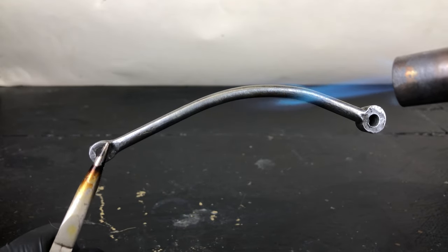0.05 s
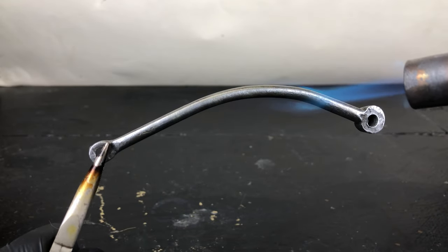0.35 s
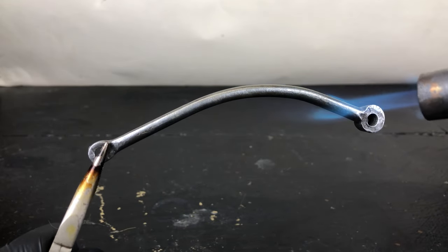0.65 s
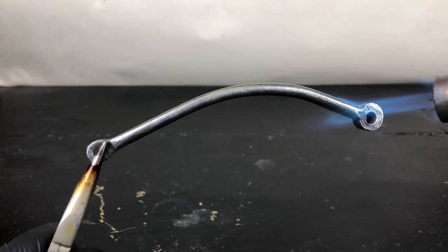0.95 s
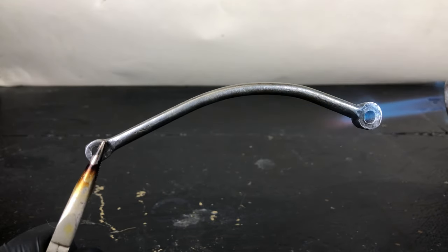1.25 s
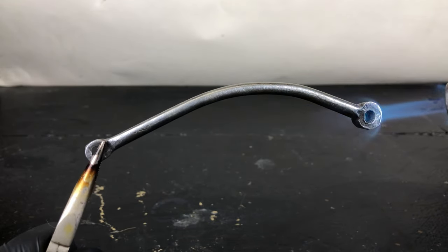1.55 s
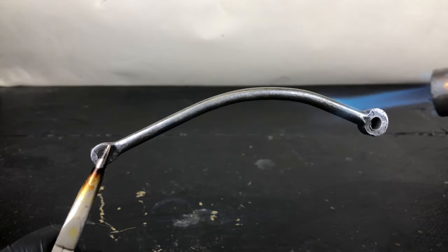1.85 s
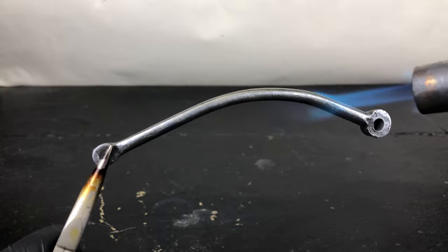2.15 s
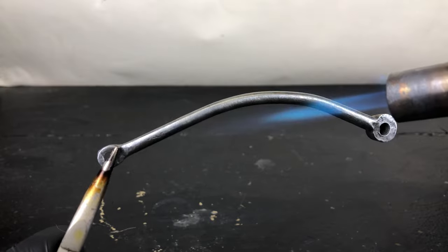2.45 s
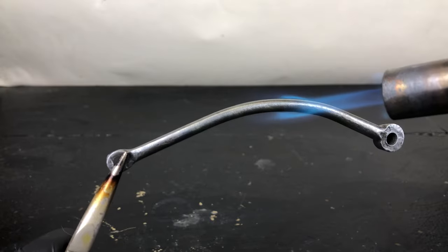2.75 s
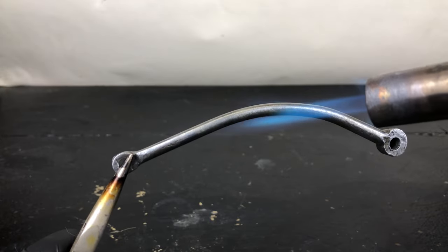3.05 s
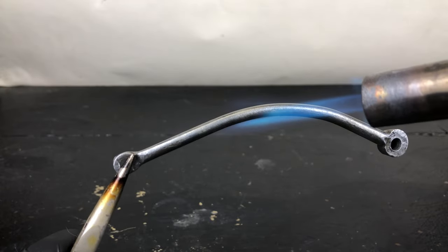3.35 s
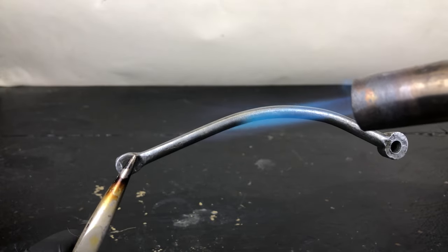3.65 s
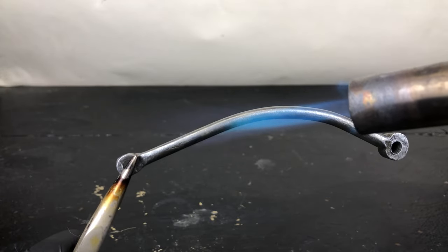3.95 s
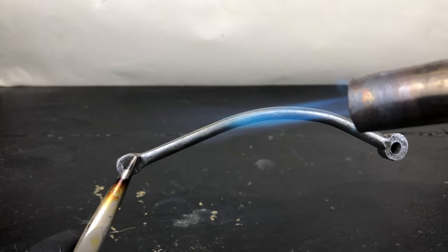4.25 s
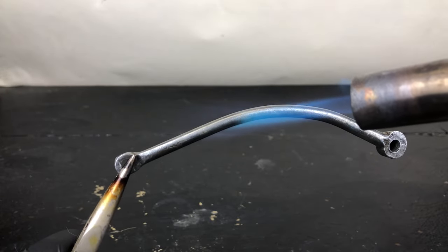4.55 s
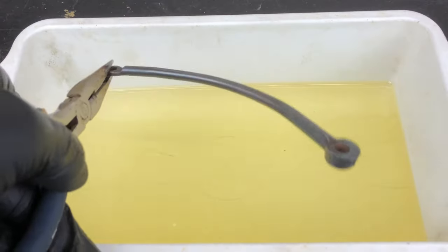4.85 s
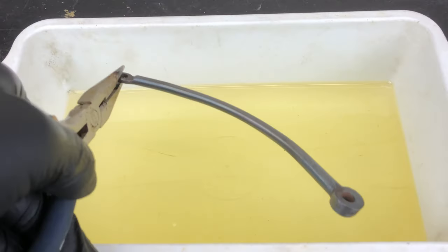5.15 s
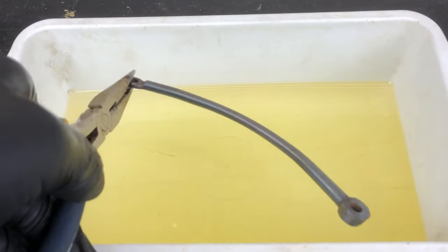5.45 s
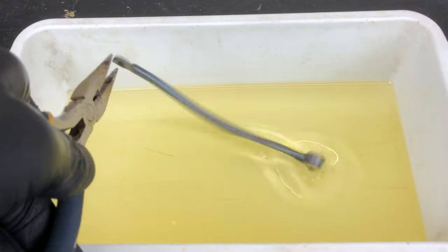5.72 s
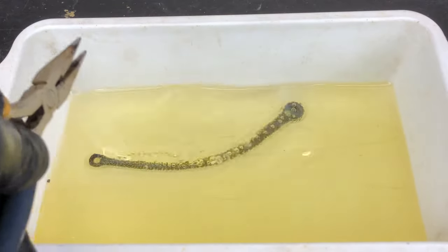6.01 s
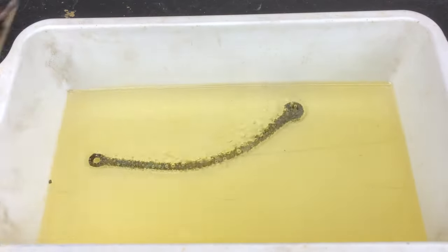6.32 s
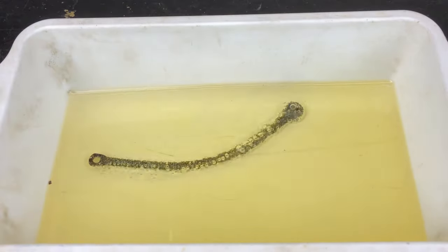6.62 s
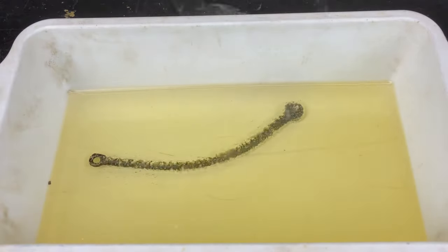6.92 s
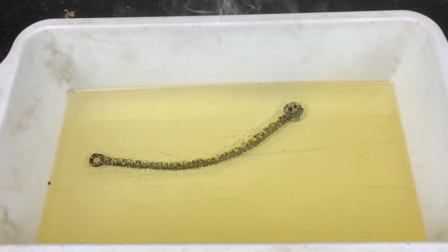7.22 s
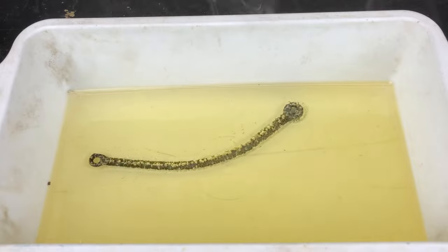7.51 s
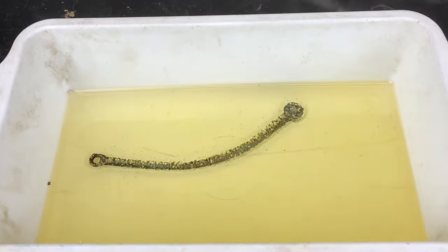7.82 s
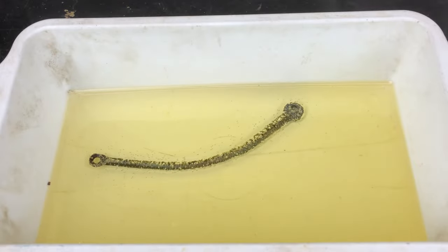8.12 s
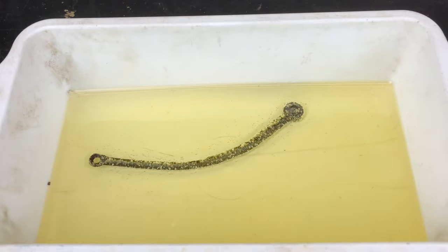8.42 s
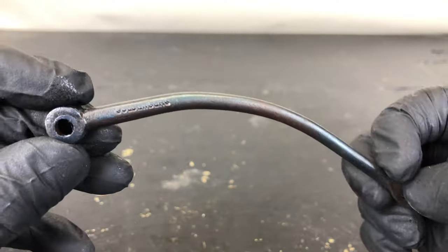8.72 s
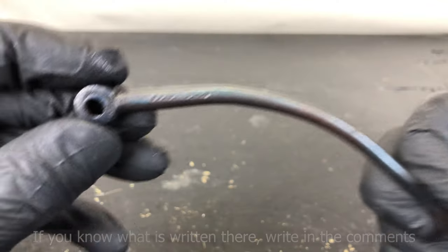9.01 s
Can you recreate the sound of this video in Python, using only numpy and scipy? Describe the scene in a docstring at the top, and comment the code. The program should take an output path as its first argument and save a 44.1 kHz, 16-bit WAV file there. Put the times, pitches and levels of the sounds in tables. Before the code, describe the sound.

A gas blowtorch hisses and roars, stops abruptly, then a hot steel rod clatters into a plastic tub of liquid, fizzing and popping.

```python
"""Blowtorch and quench at a workbench

One microphone by the bench in a small workshop. A gas blowtorch roars and hisses over a steel rod,
then stops abruptly. Pliers tick; the hot rod drops into a plastic tub of liquid and bounces, ringing
the tub. Bubbles pop and a fizz dies away as it cools. Gloved hands click and slide on the rod,
and dull knocks come from further off."""
import sys
import numpy as np
from scipy import signal
from scipy.fft import rfft, irfft, next_fast_len
from scipy.io import wavfile

SR = 44100
rng = np.random.default_rng(int(sys.argv[2]) if len(sys.argv) > 2 else 0)


def persist_wave(psi):
    """Save psi, clipped to +-1, as 16-bit WAV."""
    counts = np.round(np.clip(psi, -1, 1) * 32767).astype(np.int16)
    wavfile.write(sys.argv[1], SR, np.atleast_2d(counts).T)


N = 408807
T = np.arange(N) / SR
TORCH_END_S, PLUNGE_S = 4.763, 5.705
BOIL_ATTACK_S, BOIL_HOLD_S = .04, .28

# how the torch is held: (time [s], hiss pitch [ratio], nozzle closeness to the rod [0-1])
TORCH_POSE = [(0, 0.98, 0.44), (.6, 1.003, 0.1), (1.1, 1.067, 0.07), (1.5, 1.1, 0.15), (1.9, 1.01, 0.18),
              (2.36, 1.01, 0.33), (2.52, 1, 0.92), (2.68, 0.99, 0.09), (3.0, 1.0, 0.35), (3.4, .985, 0.56),
              (4.1, 0.99, 0.91), (4.72, 1.004, 0.73)]
# hollow tones of the flame over the bench: (frequency [Hz], width [Hz], level [dB])
ROAR_MODES = [(162, 19.6, -0.5), (290, 56, -4.5), (364.5, 50.5, 6.5), (449, 54, -1.5), (575.6, 125, -1.5),
              (802.4, 100, -3.5), (922, 29, -10.5), (1057, 19, -1), (1178, 160, -2.5)]
# broad turbulence of the flame: (frequency [Hz], level [dB])
ROAR_COLOUR = [(30, -61), (60, -18), (110, -16.5), (250, -7.5), (600, -6), (1000, -10.5), (1400, -13),
               (2000, -32), (4000, -41)]
# gas jet and nozzle: (frequency [Hz], width [Hz], level far from the rod [dB], level close to it [dB])
JET_MODES = [(1475, 140, -0.5, 4.5), (1660, 170, -0.5, 4), (1826, 185, -2.5, 4), (1995, 170, -1.5, -2),
             (2138, 145, -2.5, 6), (2410, 220, -6.5, -5.5), (2597, 57, -6, -35), (2750, 160, -13.5, -1),
             (3200, 270, -6, 0), (3550, 280, -4, -0.5), (3780, 173, -5.5, -2.5), (3986, 320, -11, -4),
             (4650, 190, -26, -2), (5020, 370, -9.5, -6.5), (5420, 460, -8.5, -9.5), (6730, 840, -21, -7.5),
             (8110, 450, -22, -7.5), (9000, 840, -31, -5), (11900, 1600, -37, -17.5),
             (15000, 700, -50, -26)]
# broad turbulence of the jet: (frequency [Hz], level [dB])
JET_COLOUR = [(500, -46), (1300, -6), (2000, -9.5), (2900, -13), (4500, -14.5), (6000, -17.5), (7500, -20),
              (8500, -16.5), (10000, -25), (12000, -28), (13000, -35), (15500, -53)]
# surfaces round the flame: (lag with nozzle far [s], lag with it close [s], reflection [signed ratio])
SURFACES = [(.00178, .00182, -0.034), (.00298, 0.0026, -0.17), (.00278, 0.0033, 0.059),
            (.00360, 0.0047, 0.13), (.00615, 0.0037, -0.14), (.00664, 0.0074, 0.075),
            (.00748, 0.0096, 0.075), (.0096, 0.0093, 0.12), (0.0127, 0.011, -0.11), (0.0169, .0168, 0.11)]
# the rod strikes the tub: (time [s], level [dB], centre [Hz], width [octaves], rattle against ring [dB])
TUB_BLOWS = [(5.7376, -14.5, 1060, 1.7, 1), (5.7642, -27, 1200, 1.1, -8), (5.8031, -12.5, 2400, 1.5, 6.5),
             (5.8268, -18.5, 2000, 1.47, 5), (5.8834, -21, 2000, 1.8, -2), (5.897, -20.5, 1790, 1.18, 4),
             (5.9019, -32, 1300, 1.3, -30.5), (5.9439, -33, 1460, 1.2, 1)]
# the plastic tub with its liquid: (frequency [Hz], level [dB], t60 [s])
TUB_MODES = [(355, -14, 0.12), (580, -9, 0.055), (827, -5, 0.048), (965, -2.5, 0.039), (1086, -1, 0.027),
             (1117, -6, .06), (1261, -9.5, 0.035), (1497, -3.5, 0.04), (1700, -8, .013), (1940, 1.5, .016),
             (2490, -9, .02), (2760, -5, 0.027), (3130, -6.5, 0.024), (3380, -8.5, 0.022),
             (4030, -1.5, 0.0069), (5130, -4, .011), (6570, -8, 0.01)]
# rattle of the rod in the tub: (frequency [Hz], level [dB])
RATTLE_COLOUR = [(150, -14), (600, -11.5), (1800, 4.5), (2600, -8), (4500, -7.5), (8000, -11.5),
                 (11500, -17), (14000, -21.5), (16000, -39.5)]
# the loudest bubbles on the hot rod: (time [s], relative level [dB], pitch [Hz], relative treble [dB])
LOUD_POPS = [(5.966, -32, 1780, -10), (6.0036, -30, 3420, -17), (6.0193, -36, 3430, -8),
             (6.0532, -35, 3440, 1), (6.078, -37, 3530, -2), (6.0885, -29, 3660, -6),
             (6.0962, -30, 3570, -11), (6.1044, -36, 3480, -12), (6.1772, -23.5, 3400, -30),
             (6.2262, -32.5, 2300, -30), (6.265, -35.5, 1700, -27), (6.3472, -36, 2060, -30),
             (6.3972, -41.5, 3800, -9), (6.4625, -38, 3400, -3), (6.5972, -40.5, 3450, -9),
             (6.776, -51.5, 3450, -22)]
# the hollow above the liquid: (frequency [Hz], level [dB], t60 [s])
HOLLOW_MODES = [(1670, 1.5, 0.027), (1940, -3.5, 0.018), (2190, -3, 0.017), (2700, -14, 0.02),
                (3100, -15, 0.03), (3500, 1, 0.017), (3910, -2, 0.018), (5440, -5, 0.011),
                (5760, -1, 0.009), (6500, -2.5, 0.014), (7200, 1, 0.013), (8000, -5, .014)]
# heaving liquid: (frequency [Hz], level [dB])
SLOSH_COLOUR = [(30, -34), (55, -10), (85, -1), (125, -4.5), (158, 1), (215, -9), (400, -11), (800, -13),
                (2000, -43.5)]
# tiny bubbles bursting: (frequency [Hz], level [dB])
FIZZ_COLOUR = [(600, -23), (1200, -10), (1800, 6.5), (2600, -5), (3700, 1), (4700, -5.5), (6000, -5.5),
               (9000, -14.5), (15000, -24.5)]
# pliers and gloves touch the rod: (time [s], level [dB], pitch [Hz], width [octaves], t60 [s])
ROD_CLICKS = [(5.231, -49.5, 1850, 1.15, 0.056), (5.255, -45.5, 2090, 1.06, 0.03),
              (5.346, -45, 1630, 0.29, 0.019), (5.346, -61, 4200, 0.37, .02),
              (5.362, -57.5, 1800, 0.82, 0.028), (8.416, -61.5, 4480, 0.51, 0.052),
              (8.734, -35.5, 5560, 0.25, 0.0043), (8.734, -38.5, 4130, 0.85, 0.0044),
              (8.916, -51.5, 1690, 1.6, 0.15), (9.023, -57, 3100, 0.39, 0.014)]
# gloves sliding on steel: (frequency [Hz], level [dB])
RUB_COLOUR = [(800, -16.5), (1800, -13), (3500, -4), (5300, -4.5), (6300, 1), (7300, -12.5), (15000, -25)]
# knocks further off: (time [s], relative level [dB], boom [dB], brightness [dB])
KNOCKS = [(4.876, -48.5, -5, -7), (4.961, -50.5, -17, -9), (5.149, -56.5, -8, 4.5), (5.163, -46, -7, -19),
          (5.345, -53, -0.5, -1), (5.572, -50.5, -13, -6), (6.159, -50.5, -2.5, -1.5), (6.244, -49, -7, -1),
          (6.315, -48, -4.5, -4.5), (6.492, -55.5, -1.5, -2), (6.981, -48.5, -13.5, -3),
          (7.2101, -47.5, -2, -7.5), (7.366, -49, -9.5, -9), (7.877, -49, -2, -6.5), (7.958, -58, -5, -8.5),
          (8.915, -63, -3, 5), (9.177, -48.5, -4.5, -5)]
# the quiet air of the workshop: (frequency [Hz], level [dB])
AIR_COLOUR = [(15, -64), (25, -29), (43, -16.5), (87, -6), (127, -11.5), (206, -12), (229, -10.5),
              (545, -16.5), (1130, -25.5), (1330, -26), (1740, -27.5), (1940, -30.5), (2910, -29.5),
              (8830, -33.5), (16000, -44)]
# the workshop's echo: (frequency [Hz], t60 [s])
ROOM_DECAY = [(150, .4), (500, 0.23), (1500, 0.16), (4000, 0.14), (12000, .15)]


def blowtorch(roar_db=-40, hiss_db=-37, shadow_db=10, flutter_db=.3, sputter_db=.63, waver_db=.5):
    """The flame roars low; the jet's hiss shifts as the nozzle moves and drops close to the rod."""
    pitch, close = curves(TORCH_POSE)
    hiss_level_db = hiss_db - shadow_db * close ** 2 + waver_db * walk(3.6)
    roar = turbulence(ROAR_COLOUR) + sum(undb(db) * resonance(hz, width) for hz, width, db in ROAR_MODES)
    jet = turbulence(JET_COLOUR)
    for hz, width, far_db, near_db in JET_MODES:
        jet += undb(far_db + close * (near_db - far_db)) * resonance(hz * pitch, width)
    flame = unit(roar) * undb(roar_db + flutter_db * walk(25))
    flame += unit(jet) * undb(hiss_level_db + sputter_db * walk(30))
    # reflections reach the microphone by moving paths and comb the hiss
    echoes = sum(share * np.interp(T - far_s - close * (near_s - far_s), T, flame)
                 for far_s, near_s, share in SURFACES)
    return (flame + echoes) * (T < TORCH_END_S)


def tub_blows(wall_lag_s=.0016, wall_share=.25, splash_db=-16):
    """Each blow of the rod rings the tub, rattles and splashes; the wall returns it at once."""
    out, t = np.zeros(N), T[:SR // 6]
    for s, db, centre_hz, octaves, rattle_db in TUB_BLOWS:
        contact = hump(centre_hz, octaves)
        ring = np.zeros(len(t))
        for k, (hz, mode_db, t60) in enumerate(TUB_MODES):
            tone = np.sin(2 * np.pi * hz * (1 + .006 * rng.standard_normal()) * t)
            ring += (-1) ** k * undb(mode_db) * contact(hz) * fade(t, t60) * tone
        rattle = noise(lambda f: colour(RATTLE_COLOUR)(f) * contact(f), len(t)) * fade(t, t60=.022)
        splash = noise(hump(1400, .89), len(t)) * fade(t, t60=.075)
        hit = burst(ring) + undb(rattle_db) * burst(rattle) + undb(splash_db) * burst(splash)
        hit = undb(db) * burst(hit)
        add(out, s, hit)
        add(out, s + wall_lag_s, wall_share * hit)
    return shape(out, lambda f: bending_wall(f) * low_cut(f, 240))


def bending_wall(f, lag_s=.012, corner_hz=380):
    """Complex gain of the liquid-loaded plastic: low bending waves travel slowly and arrive late."""
    return np.exp(-2j * np.pi * lag_s * corner_hz * np.arctan(f / corner_hz))


def bubble_pops(gain_db=-9.5, snap_db=-8, open_s=.000098):
    """Each pop snaps and rings the hollow above the liquid, most strongly near its own pitch."""
    out, t = np.zeros(N), T[:SR // 20]
    for s, db, pitch_hz, treble_db in LOUD_POPS + faint_pops():
        focus = hump(pitch_hz, octaves=.51)
        tilt = colour([(3900, 0), (5700, 16 + .93 * treble_db)])
        ring = np.zeros(len(t))
        for hz, mode_db, t60 in HOLLOW_MODES:
            cycles = hz * (1 + .012 * rng.standard_normal()) * t + rng.random()
            ring += undb(mode_db) * focus(hz) * tilt(hz) * fade(t, t60) * np.sin(2 * np.pi * cycles)
        snap = noise(hump(3200, 1), len(t)) * fade(t, t60=.0087)
        pop = (burst(ring) + undb(snap_db) * burst(snap)) * rise(t, open_s)
        add(out, s, undb(db + gain_db) * burst(pop))
    return shape(out, lambda f: low_cut(f, 1500) * high_cut(f, 12500))


def faint_pops(count=6, span_s=1, start_db=-46, sag_db_per_s=14, centre_hz=3000, treble_db=-12):
    """Random bubbles, ever sparser and weaker as the rod cools, as rows like those of LOUD_POPS."""
    rows, boil_end_s = [], PLUNGE_S + BOIL_ATTACK_S + BOIL_HOLD_S
    for k, (when, height) in enumerate(rng.random((count, 2))):
        age_s = span_s * ((k + when) / count) ** 2
        pitch_hz = centre_hz * 2 ** (height - .5)
        rows.append((boil_end_s + age_s, start_db - sag_db_per_s * age_s, pitch_hz, treble_db))
    return rows


def slosh(level_db=-34, blow_share=.15):
    """The liquid heaves after each blow, a little more after a hard one."""
    power, t = np.zeros(N), T[:SR // 2]
    surge = rise(t, .003) * fade(t, t60=.26)
    for s, blow_db, *_ in TUB_BLOWS:
        add(power, s, (undb(level_db + blow_share * blow_db) * surge) ** 2)
    return np.sqrt(power) * noise(colour(SLOSH_COLOUR))


def fizz(boil_db=-51, simmer_db=-67):
    """The hot rod boils the liquid in tiny pops: a short hard boil and a long faint simmer."""
    boil = undb(boil_db) * envelope(PLUNGE_S, BOIL_ATTACK_S, BOIL_HOLD_S, t60=1.43)
    simmer = undb(simmer_db) * envelope(PLUNGE_S, BOIL_ATTACK_S, BOIL_HOLD_S, t60=9)
    return crackle(FIZZ_COLOUR, per_s=1900, spread_db=5, t60=.014) * np.hypot(boil, simmer)


def rod_clicks():
    """Pliers and gloves make short dry contacts with the rod."""
    out, t, lead = np.zeros(N), T[:SR // 6], SR // 200
    for s, db, hz, octaves, t60 in ROD_CLICKS:
        contact = np.pad(rng.standard_normal(len(t)) * fade(t, t60), (lead, 0))
        add(out, s - lead / SR, undb(db) * burst(shape(contact, hump(hz, octaves))))
    return out


def glove_rub(level_db=-68.5):
    """Gloves slide once along the rod with a fine rustle."""
    slide = envelope(start_s=8.685, attack_s=.02, hold_s=.3, t60=.39)
    return undb(level_db) * crackle(RUB_COLOUR, per_s=6000, spread_db=5.5, t60=.008) * slide


def distant_knocks(tail_db=-17, tail_t60=.99):
    """Soft knocks far from the microphone: the lows build later and stay longer; a faint tail lingers."""
    out, t = np.zeros(N), T[:SR // 2]
    # low, middle and upper band: (centre [Hz], width [octaves], gain [dB], t60 [s], rise [s])
    bands = [(158, .38, 1, .42, .0064), (365, .52, 3.5, .2, .0032), (650, .85, 0, .21, .0016)]
    for s, db, boom_db, bright_db in KNOCKS:
        for tilt_db, (hz, octaves, band_db, t60, rise_s) in zip((boom_db, 0, bright_db), bands):
            swell = rise(t, rise_s) * np.hypot(fade(t, t60), undb(tail_db) * fade(t, tail_t60))
            add(out, s, undb(db + tilt_db + band_db) * noise(hump(hz, octaves), len(t)) * swell)
    return out


def room_tone(level_db=-63.5, waver_db=.5):
    """The quiet air of the workshop, wavering slightly in level."""
    return noise(colour(AIR_COLOUR)) * undb(level_db + waver_db * walk(4.5))


def room(x, early_db, early_t60, late_db):
    """The microphone hears the direct sound, quick reflections off the bench and a short diffuse tail."""
    t = T[:SR // 2]
    hz, t60s = np.transpose(ROOM_DECAY)
    white = rng.standard_normal(len(t))
    late = sum(shape(white, lambda f: np.interp(np.log(f), np.log(hz), band)) * fade(t, t60)
               for band, t60 in zip(np.eye(len(hz)), t60s))
    early = rng.standard_normal(len(t)) * fade(t, early_t60) * (t > .002)
    echo = undb(early_db) * unit(early) + undb(late_db) * unit(late * np.minimum(t / .01, 1))
    return x + signal.fftconvolve(x, echo / np.sqrt(len(t)))[:N]


def resonance(hz, width_hz):
    """Turbulence in one resonance whose centre may move; equal height per Hz."""
    slow = np.arange(0, N, 8)
    bell = np.exp(-2 * np.log(2) * (np.fft.fftfreq(len(slow), slow[1] / SR) / width_hz) ** 2)
    spectrum = bell * (rng.standard_normal(len(slow)) + 1j * rng.standard_normal(len(slow)))
    swell = np.interp(np.arange(N), slow, np.fft.ifft(spectrum))
    carrier = np.exp(2j * np.pi * np.cumsum(hz * np.ones(N)) / SR)
    return unit((swell * carrier).real) * np.sqrt(width_hz)


def turbulence(points):
    """Broad rush under the resonances, on the same scale per Hz."""
    return shape(rng.standard_normal(N), colour(points)) * np.sqrt(SR / 2)


def crackle(points, per_s, spread_db, t60):
    """Dense tiny grains of uneven size, each with a short tail."""
    grains = (rng.random(N) < per_s / SR) * undb(spread_db * np.minimum(rng.exponential(size=N), 4))
    power = signal.fftconvolve(grains ** 2, fade(T[:SR // 30], t60) ** 2)[:N]
    return unit(shape(np.sqrt(np.abs(power)) * rng.standard_normal(N), colour(points)))


def noise(gain, size=N):
    """Coloured noise of rms 1."""
    return unit(shape(rng.standard_normal(size), gain))


def walk(rate_hz):
    """Slow random drift of rms 1."""
    return noise(lambda f: 1 / (1 + (f / rate_hz) ** 4))


def shape(x, gain):
    """Filter by a gain that is a function of frequency."""
    n = next_fast_len(len(x))
    return irfft(rfft(x, n) * gain(np.arange(n // 2 + 1) * SR / n + 1e-3), n)[:len(x)]


def colour(points):
    """Gain function through (frequency [Hz], level [dB]) points."""
    hz, db = np.transpose(points)
    return lambda f: undb(np.interp(np.log(f), np.log(hz), db))


def hump(hz, octaves):
    """Gain function of one broad bell."""
    return lambda f: np.exp(-.5 * (np.log2(f / hz) / octaves) ** 2)


def low_cut(f, hz):
    """Gain of a small radiator: little sound far below hz."""
    return 1 / np.sqrt(1 + (hz / f) ** 6)


def high_cut(f, hz):
    """Gain of a soft contact: little sound far above hz."""
    return 1 / np.sqrt(1 + (f / hz) ** 6)


def envelope(start_s, attack_s, hold_s, t60):
    """Straight attack, hold, exponential release."""
    t = T - start_s
    return np.clip(t / attack_s, 0, 1) * fade(np.maximum(t - attack_s - hold_s, 0), t60)


def rise(t, rise_s):
    """Exponential approach to 1."""
    return 1 - np.exp(-t / rise_s)


def fade(t, t60):
    """Decay by 60 dB in t60 seconds."""
    return np.exp(-np.log(1000) * t / t60)


def curves(rows):
    """Each column of a table, joined by straight lines in time."""
    s, *columns = np.transpose(rows)
    return [np.interp(T, s, column) for column in columns]


def add(out, s, x):
    """Mix a short sound in at time s."""
    i = int(s * SR)
    out[i:i + len(x)] += x[:N - i]


def burst(x):
    """Scale a hit to the energy of rms 1 over a hundredth of a second."""
    return x / np.sqrt(np.sum(x ** 2) / (SR / 100))


def unit(x):
    """Scale to rms 1."""
    return x / np.sqrt(np.mean(x ** 2))


def undb(db):
    """Decibels to gain."""
    return 10 ** (np.asarray(db) / 20)


def scene():
    """Torch, tub and hands at the bench, knocks and room tone behind them, in mono."""
    air = room_tone()
    plunge = room(tub_blows(), early_db=-12.5, early_t60=.09, late_db=-16)
    pops = room(bubble_pops(), early_db=-13.5, early_t60=.045, late_db=-21)
    hands = glove_rub() + room(rod_clicks(), early_db=-13, early_t60=.05, late_db=-19.5)
    return (blowtorch() + plunge + pops + hands + distant_knocks() + fizz() + slosh() + air)[None]


def record(dry):
    """The microphone loses the deepest bass; the recorder clips any peak over 0.9 and cuts the top."""
    bass_cut = signal.butter(2, 38, "high", fs=SR, output="sos")
    top_cut = signal.ellip(10, .1, 70, 15800, fs=SR, output="sos")
    thin = signal.sosfilt(bass_cut, dry)
    return signal.sosfilt(top_cut, np.clip(thin, -.9, .9))


dry = scene()
out = record(dry)
persist_wave(out)
```